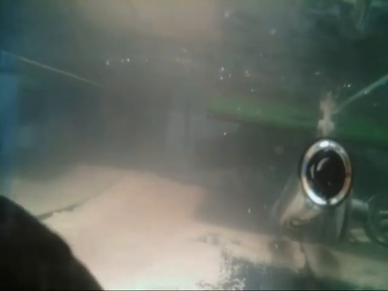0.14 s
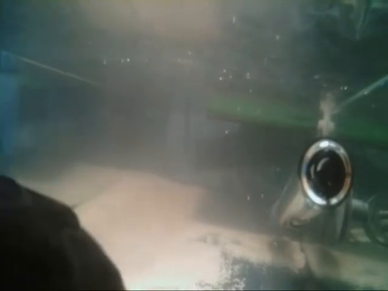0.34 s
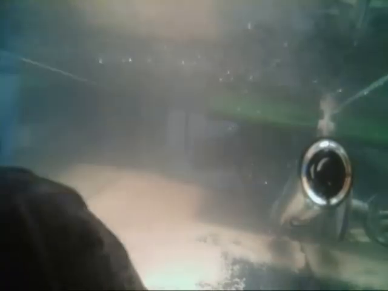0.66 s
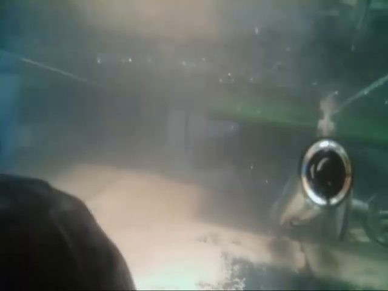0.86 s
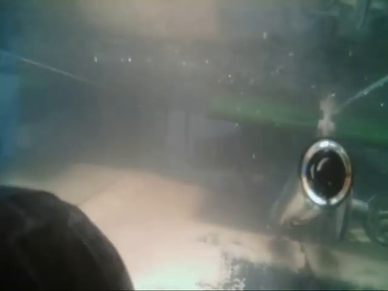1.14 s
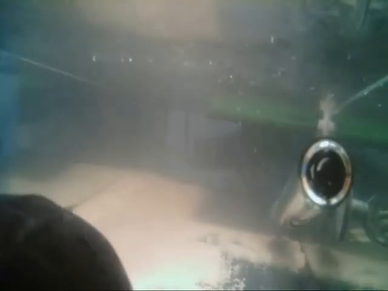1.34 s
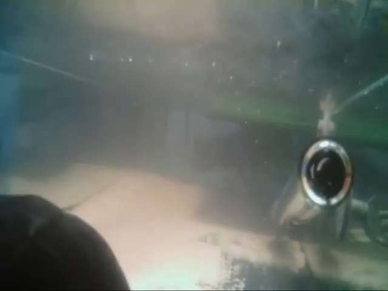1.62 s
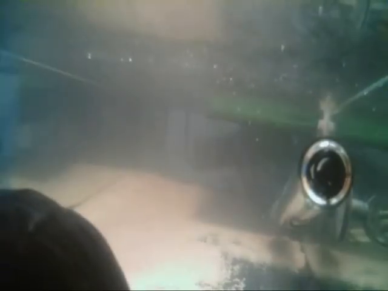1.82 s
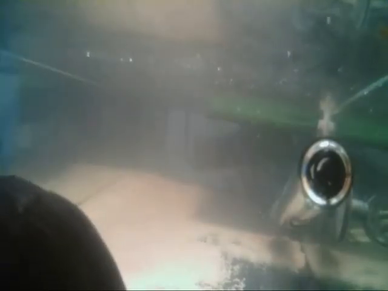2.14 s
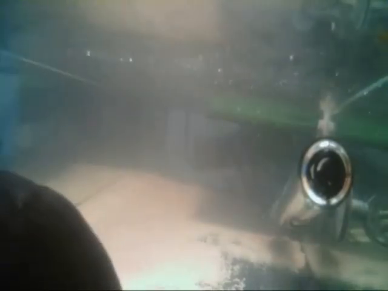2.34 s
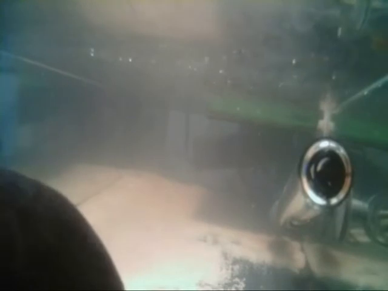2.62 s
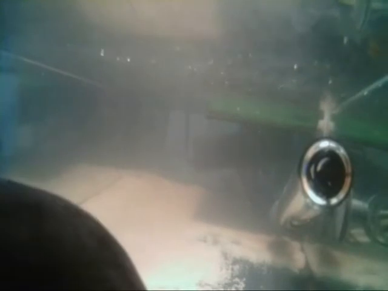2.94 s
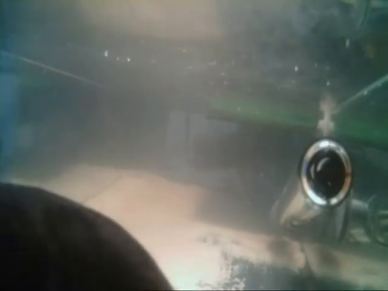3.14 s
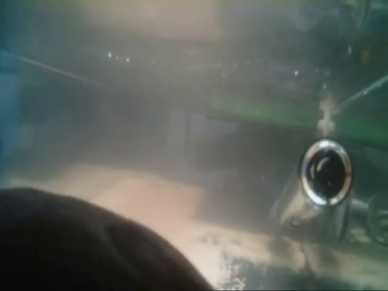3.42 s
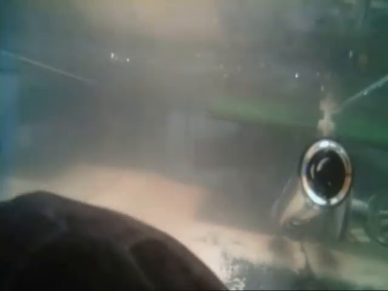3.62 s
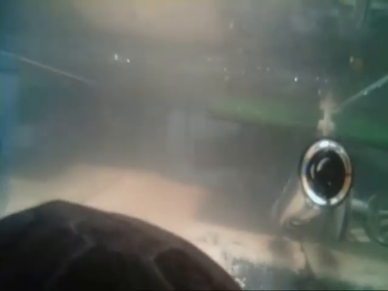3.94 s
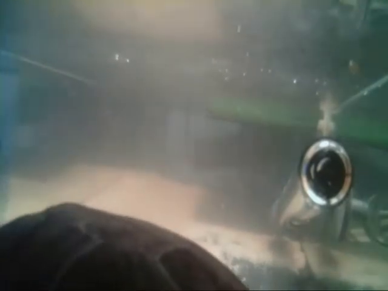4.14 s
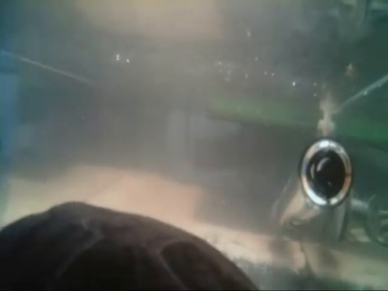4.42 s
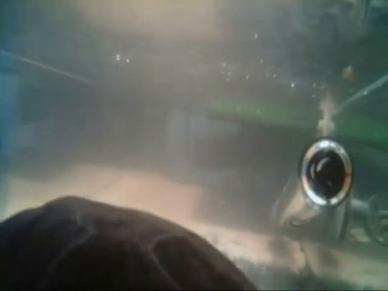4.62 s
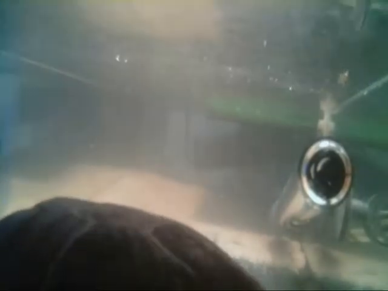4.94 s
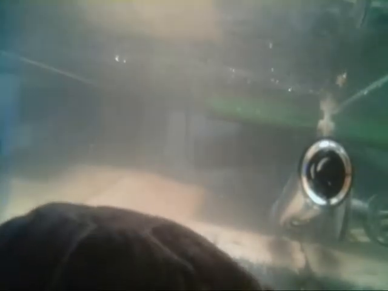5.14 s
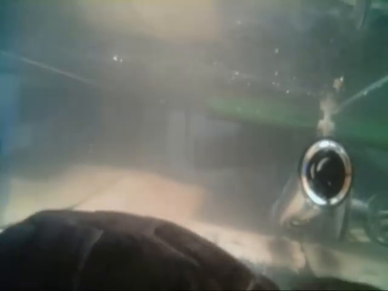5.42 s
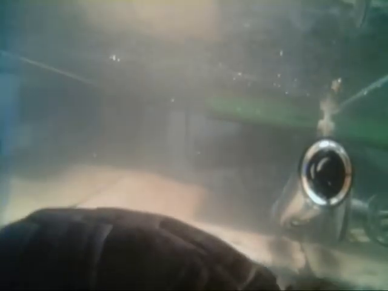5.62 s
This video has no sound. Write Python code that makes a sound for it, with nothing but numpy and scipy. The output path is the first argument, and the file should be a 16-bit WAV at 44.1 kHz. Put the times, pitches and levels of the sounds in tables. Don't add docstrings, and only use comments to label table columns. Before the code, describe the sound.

Underwater in an aquarium, a rough electrical drone pulses constantly while a turtle's shell clicks once, then bumps softly against something later.

```python
import sys
import numpy as np
from scipy import signal
from scipy.fft import rfft, irfft, next_fast_len
from scipy.io import wavfile
from scipy.ndimage import uniform_filter1d, map_coordinates

SR = 44100
rng = np.random.default_rng(int(sys.argv[2]) if len(sys.argv) > 2 else 0)


def invert_db(x):
    u = np.asarray(x, float) / 20
    return 10 ** u


def persist_wave(psi):
    counts = np.round(np.clip(psi, -1, 1) * 32767).astype(np.int16)
    wavfile.write(sys.argv[1], SR, np.atleast_2d(counts).T)


N = 254456
MAINS_HZ, FRAME_HZ = 49.981, 29.98

# centre in Hz, width in Hz, level in dB.
LINE_BANDS = [(10, 22, -29.9), (158.6, 35.8, -46.7)]
# multiple of the mains rate, peak in dB.
CABLE_HUM = [(1, -69), (2, -64), (5, -68), (6, -71), (8, -70), (9, -64)]
# multiple of the mains rate, peak in dB.
HOUSING_SHAKE = [(3, -50.7), (4, -59.5)]
# multiple of the frame rate, peak in dB.
FRAME_BUZZ = [(1, -64.5), (2, -72), (3, -75)]
# frequency in Hz, density in dB per Hz.
WATER_SPECTRUM = [(20, -16), (40, -7.5), (165, -8), (225, -4.5), (330, -17), (470, 0), (555, -11.5),
                  (900, -36)]
# frequency in Hz, density in dB per Hz.
HISS_SPECTRUM = [(20, -2), (600, -0.5), (1000, -1), (2000, -3), (3000, -4.5), (4500, -5), (5200, -4),
                 (7000, -10.5)]
# start in seconds, level in dB.
SHELL_TICKS = [
    (.90346, -20.2),
    (.9049, -39),
    (.90621, -42),
    (.90988, -52),
]
# frequency in Hz, level in dB, 60 dB decay in seconds.
SHELL_MODES = [(496, 2, .015), (601, -4, .011), (852, 7.5, .005), (1387, 5, .004), (1360, -18, .035),
               (2051, -11, .017), (2334, 7, .011), (2915, -15, .022), (3300, -5, .004), (4400, 0, .005)]
# start in seconds, level in dB.
ROCKING_KNOCKS = [
    (3.5856, -40),
    (4.18595, -24),
]
# start in seconds, level in dB.
SOFT_NUDGES = [
    (4.1953, -30.5),
    (5.2552, -45),
    (5.2595, -42),
]
# frequency in Hz, level in dB, 60 dB decay in seconds.
TANK_MODES = [(131, -20, .15), (216, -9.5, .067), (284, -3, .052), (416, 9.5, .017), (462, -5, .06),
              (642, -6, .013), (840, 7, .004)]


def filtered(x, response):
    size = next_fast_len(N + SR // 2)
    hz = np.fft.rfftfreq(size, 1 / SR)
    return irfft(rfft(x, size) * response(hz), size)[:N]


def impulses(at_s, sizes):
    at = at_s[:, None] * SR
    index = np.floor(at) + np.arange(-7, 9)
    offset = index - at
    shape = np.sinc(offset) * np.cos(np.pi * offset / 16) ** 2
    weights = sizes[:, None] * shape
    return np.bincount(index.ravel().astype(int), weights.ravel(), N + SR)[:N]


def switching_times(edge, rising):
    cycle_s, first_fall_s, low_s = .0206809, .008542, .009469
    mean_lag_ms, wander_ms, early_ms = .065, .15, .17
    wander_s, least_lag_s = 5.9, 3.05
    at_s = first_fall_s + edge // 2 * cycle_s + rising * low_s
    wander = np.cos(2 * np.pi * (at_s - least_lag_s) / wander_s)
    lag_ms = mean_lag_ms - wander_ms * wander - early_ms * (edge % 3 == 0)
    return at_s + lag_ms / 1000


def pump_drive():
    edge_db, scatter_db, fall_s = -32.0, 0.35, 0.00094
    step_ms, step_size = .88, .16
    edge = np.arange(int(2 * N / SR / .0206809) + 1)
    rising = edge % 2
    direction = 2 * rising - 1
    at_s = switching_times(edge, rising)
    size = direction * invert_db(scatter_db * rng.standard_normal(len(edge)))
    steps = impulses(at_s + direction * step_ms / 1000, step_size * size)
    edges = impulses(at_s, size) + steps

    def path(f):
        leak = fall_s / (1 + 2j * np.pi * f * fall_s)
        bands = sum(invert_db(db) * 1j * f * width / (hz * hz - f * f + 1j * f * width)
                    for hz, width, db in LINE_BANDS)
        return invert_db(edge_db) * leak - bands / 1000

    return SR * filtered(edges, path)


def mains_partials(lines, half_turns):
    lead_s = .0096
    half_cycles = 2 * MAINS_HZ * (np.arange(N) / SR + lead_s)
    return sum(invert_db(db) * np.cos(np.pi * (k * half_cycles + half_turns)) for k, db in lines)


def mains_hum():
    return mains_partials(CABLE_HUM, -.77) + mains_partials(HOUSING_SHAKE, -.09)


def frame_buzz():
    t = np.arange(N) / SR
    return sum(invert_db(db) * np.cos(2 * np.pi * k * FRAME_HZ * t + .7) for k, db in FRAME_BUZZ)


def rush(spectrum, patchy_db):
    z = signal.stft(rng.standard_normal(N), nperseg=1024)[2]
    field = uniform_filter1d(rng.standard_normal(z.shape), 4, 0)
    field = uniform_filter1d(field, 5, 1)
    patchy = z * invert_db(patchy_db * field / field.std())
    noise = signal.istft(patchy, nperseg=1024)[1][:N]
    hz, db = np.transpose(spectrum)
    x = filtered(noise, lambda f: invert_db(np.interp(np.log(f + 1), np.log(hz), db, right=-120)))
    return x / x.std()


def water():
    return invert_db(-62.0) * rush(WATER_SPECTRUM, patchy_db=1.5)


def hiss():
    return invert_db(-63.5) * rush(HISS_SPECTRUM, patchy_db=.5)


def contacts(events, modes):
    attack_s = .004
    out = np.zeros(N + SR)
    t = np.arange(SR // 5) / SR
    swell = 1 - np.exp(-t / attack_s)
    for start_s, db in events:
        ring = sum(invert_db(level + rng.normal(0, .5) - 60 * t / t60) * np.sin(2 * np.pi * hz * t)
                   for hz, level, t60 in modes)
        out[round(start_s * SR):][:len(t)] -= invert_db(db) * ring * swell
    return out[:N]


def shell_ticks():
    return contacts(SHELL_TICKS, SHELL_MODES)


def soft_knocks():
    rock_s, rock_db = .0014, -3
    second = [(s + rock_s, db + rock_db) for s, db in ROCKING_KNOCKS]
    ringing = contacts([*SOFT_NUDGES, *ROCKING_KNOCKS, *second], TANK_MODES)
    return filtered(ringing, lambda f: 1 / np.sqrt(1 + (f / 800) ** 8))


def scene():
    electrical = pump_drive() + mains_hum() + frame_buzz()
    return (electrical + water() + hiss() + shell_ticks() + soft_knocks())[None]


def band_limit(x):
    return signal.sosfilt(signal.butter(12, 16450, fs=SR, output="sos"), x)


def record(dry):
    hold_hz, top_hz, noise_db, offset = 11027.69, 15870, -78.0, .0071
    smooth = filtered(dry[0], lambda f: 1 / np.sqrt(1 + (f / 5050) ** 14))
    tick = np.floor(np.arange(N) * hold_hz / SR) + .5
    held = map_coordinates(smooth, [tick * SR / hold_hz - .5], mode="nearest")
    held = held + invert_db(noise_db) * rng.standard_normal(N)
    held = filtered(held, lambda f: np.where(f < top_hz, 1, invert_db(-27)))
    return band_limit(held[None] + offset)


dry = scene()
out = record(dry)
persist_wave(out)
```